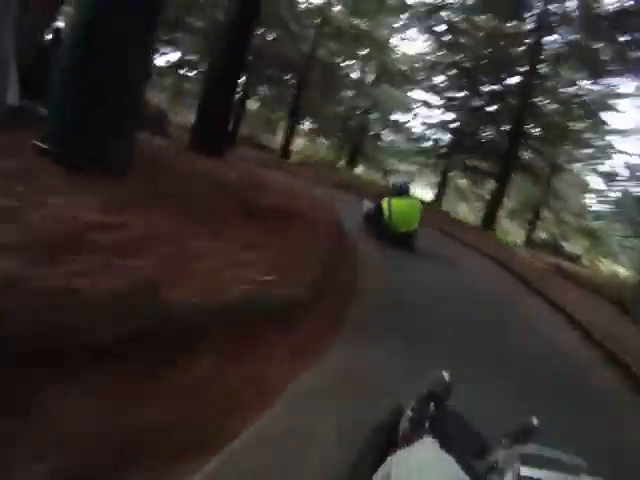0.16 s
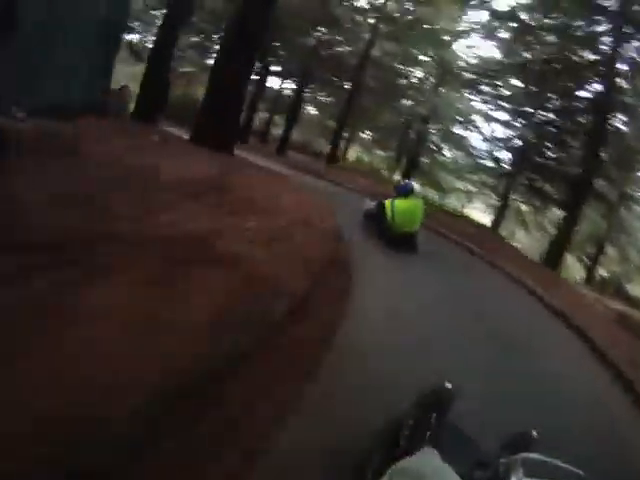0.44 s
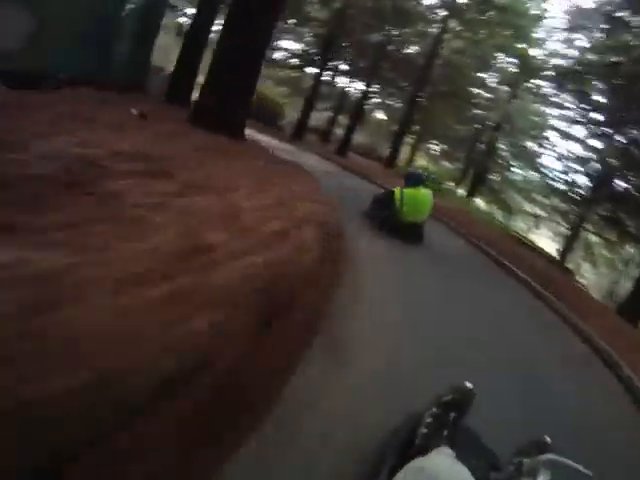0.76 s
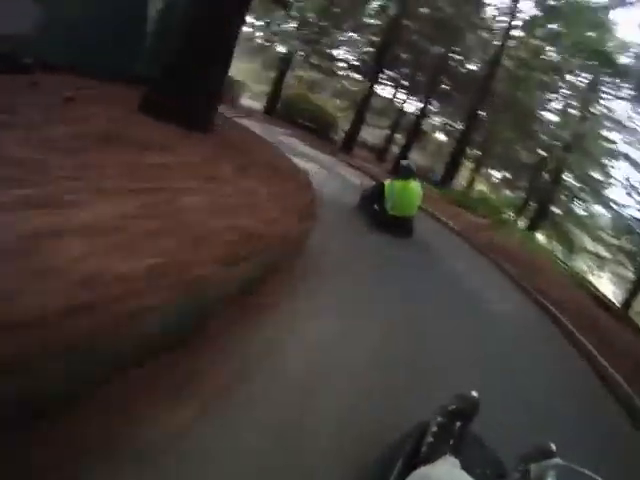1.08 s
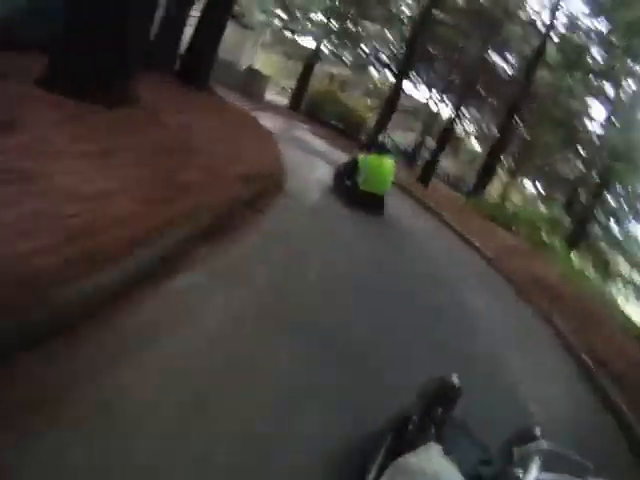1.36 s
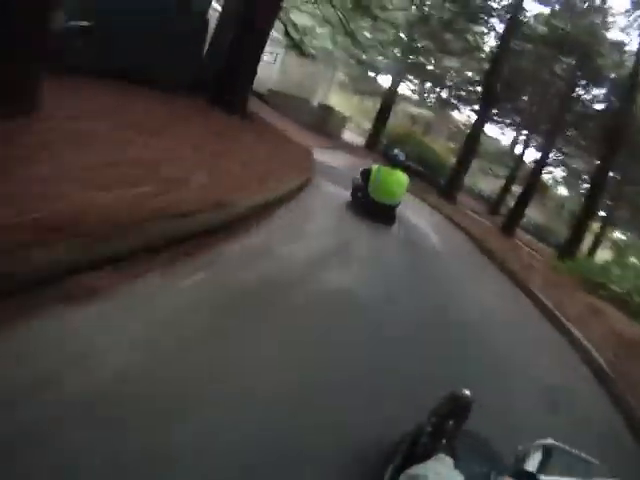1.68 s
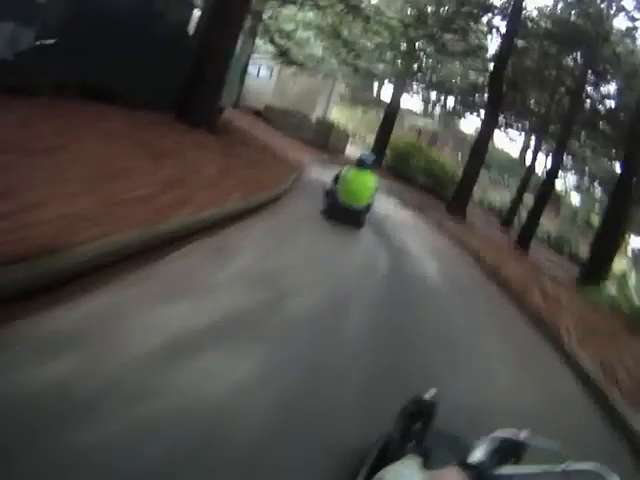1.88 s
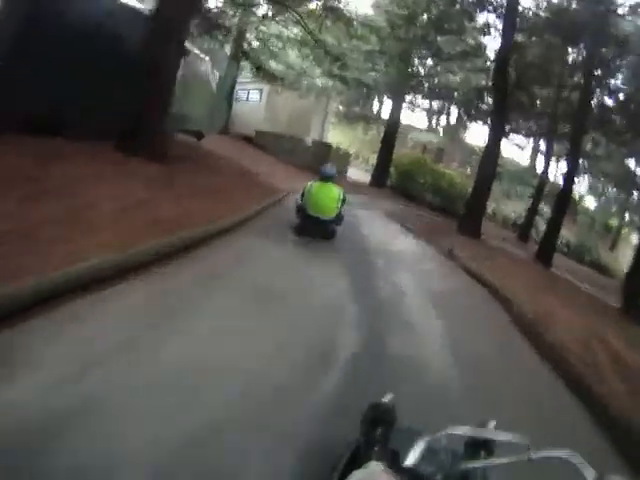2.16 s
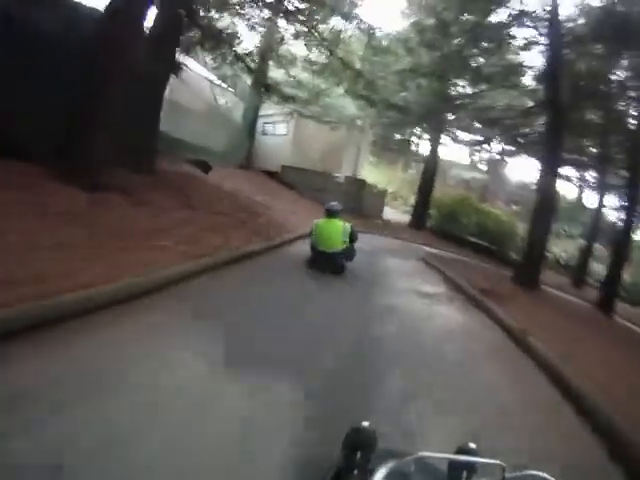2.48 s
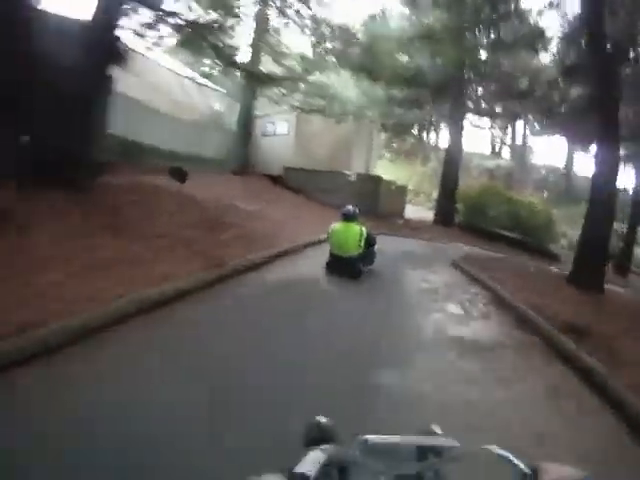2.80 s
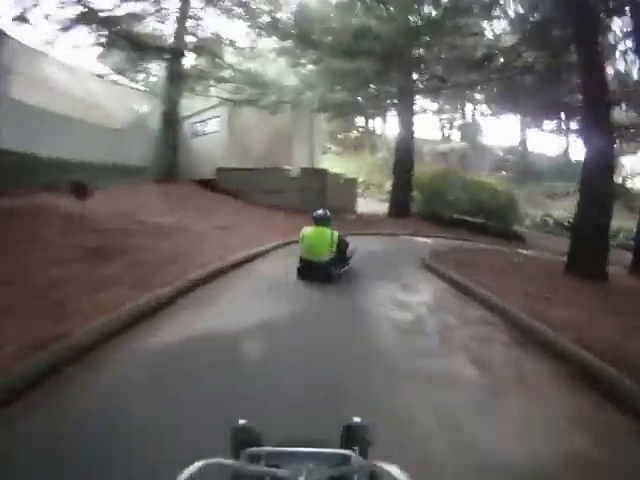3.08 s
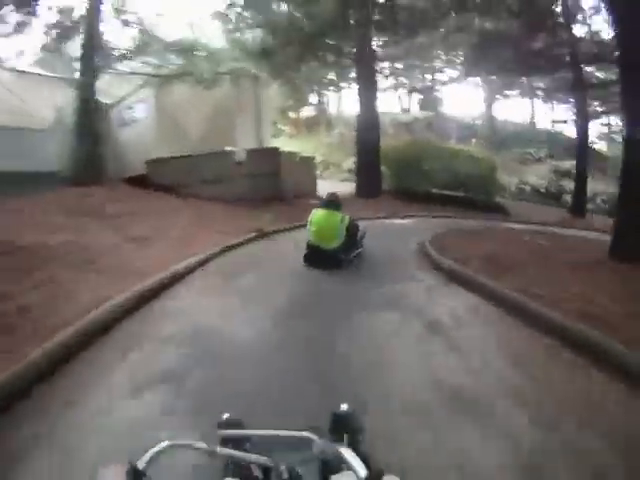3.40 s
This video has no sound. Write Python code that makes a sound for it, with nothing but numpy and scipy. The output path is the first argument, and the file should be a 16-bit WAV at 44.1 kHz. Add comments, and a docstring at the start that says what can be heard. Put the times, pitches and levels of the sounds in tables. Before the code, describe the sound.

A small cart rumbles over asphalt, rattling over bumps as wind buffets the microphone.

```python
"""Luge cart on a paved track

A coasting cart is heard from a camera in a housing on the rider. Hard wheels grind and drone on the
asphalt, driving the resonances of the plastic tub. Bumps knock the cart and ring its frame, grit
snaps and loose fittings chatter. Wind buffets the camera, jolts shove it, and for about half a
second the cart shudders at the turning rate of its wheels."""
import sys
import numpy as np
from scipy import signal
from scipy.fft import rfft, irfft
from scipy.io import wavfile

SR = 44100
rng = np.random.default_rng(int(sys.argv[2]) if len(sys.argv) > 2 else 0)


def output_pcm(signal):
    """Save a mono or channel-first signal as 16-bit PCM at the path in sys.argv[1].

    Samples are clipped to [-1, 1] before scaling.
    """
    pcm = np.clip(np.atleast_2d(signal).T, -1, 1) * 32767
    wavfile.write(sys.argv[1], SR, np.round(pcm).astype(np.int16))


N = 156114
T = np.arange(N) / SR

# grinding of the wheels on asphalt (time [s], relative level [dB])
ROLL_LEVEL = [(0, -50), (.17, -45.5), (.38, -44), (.54, -50), (.6, -47.5), (.72, -46.5), (.95, -50.5),
              (1.05, -47), (1.4, -48), (1.65, -49.5), (1.8, -45), (1.92, -42.5), (2.08, -46.5),
              (2.27, -45.5), (2.72, -46), (2.84, -44), (3.17, -46), (3.36, -44), (3.54, -45.5)]
# spectrum of the grinding (frequency [Hz], relative level [dB])
ROLL_SPECTRUM = [(40, 12.5), (120, -1.5), (270, 0.5), (480, 5.5), (700, -2.5), (1000, 0), (2300, -7),
                 (4000, -28.5), (7000, -30), (15000, -30)]
# chatter of grit and fittings (time [s], level [dB])
CHATTER_LEVEL = [(0, -55.5), (.46, -54.5), (.53, -60), (.6, -53.5), (.68, -57), (.94, -59.5), (1.0, -53),
                 (1.2, -56.5), (1.48, -55.5), (1.65, -60.5), (1.71, -54.5), (1.8, -54), (1.87, -51),
                 (2.12, -57.5), (2.22, -52), (2.37, -57.5), (2.46, -53), (2.7, -55), (2.82, -51),
                 (2.97, -54), (3.17, -53), (3.4, -49.5), (3.54, -54)]
# spectrum of the chatter (frequency [Hz], relative level [dB])
CHATTER_SPECTRUM = [(200, -22), (1500, -2), (3500, 11.5), (5000, 5.5), (8000, -2.5), (11000, 0),
                    (13800, -3.5), (15500, -14)]
# boom of the tub (time [s], relative level [dB])
BOOM_LEVEL = [(0, -34.5), (.16, -36.5), (.36, -35), (.53, -38), (.76, -34.5), (.9, -44), (1.07, -38),
              (1.3, -39), (1.6, -41.5), (1.85, -37.5), (2.05, -38), (2.35, -38), (2.55, -34.5),
              (2.72, -37.5), (2.83, -33), (2.96, -40.5), (3.12, -35), (3.54, -35.5)]
# modes of the plastic tub (frequency [Hz], bandwidth [Hz], relative level [dB])
TUB_MODES = [(61.5, 16, -7), (147.7, 20.7, -1), (175.3, 29.5, -0.5), (219.9, 13.4, -4.5),
             (311.2, 38.5, -10.5)]
# hollow drone of the wheels, higher in the bend (time [s], frequency [Hz], level [dB])
DRONE_CURVE = [(0, 505, -56), (.5, 502.4, -55.5), (1.901, 500, -60), (2.2, 400, -48.5), (2.5, 400, -53.5),
               (2.545, 389, -43.5), (2.59, 419.3, -50), (2.65, 405.3, -46), (2.739, 400, -57),
               (3.102, 387.5, -54)]
# wind on the camera (time [s], relative level [dB])
WIND_LEVEL = [(0, -30), (.12, -32.5), (.2, -39), (.39, -32), (.55, -39), (.66, -30), (.75, -50), (.86, -36),
              (1.15, -41), (1.45, -43.5), (1.56, -35), (1.8, -38), (1.92, -32.5), (2.15, -39.5),
              (2.45, -37), (3.54, -39)]
# spectrum of the wind (frequency [Hz], relative level [dB])
WIND_SPECTRUM = [(5, -11.5), (15, 1), (26, 0.5), (40, -1), (52, -12.5), (72, -11.5), (100, -22.5),
                 (200, -27.5), (600, -45.5), (4000, -101)]
# bumps in the track, in relative levels (time [s], knock [dB], rattle [dB], thump [dB], decay time [s])
TRACK_BUMPS = [(0.047, -46, -51, -63, 0.0053), (0.073, -51, -47, -60, 0.0053),
               (0.174, -39, -57, -35.5, 0.0077), (0.218, -36.5, -64, -46, 0.0034),
               (0.309, -46.5, -62, -43, 0.018), (.346, -45.5, -58, -35, .012),
               (.584, -45, -55, -31.5, 0.045), (.821, -47, -59, -37.5, 0.017), (0.982, -51, -55, -50, .008),
               (1.071, -45, -48.5, -39, 0.011), (1.692, -44.5, -54, -33.5, 0.04),
               (1.828, -38, -50.5, -32.5, 0.012), (1.910, -38.5, -65, -37, 0.01),
               (2.159, -45, -49, -37, 0.012), (2.194, -40.5, -49.5, -50, 0.015),
               (2.252, -43.5, -51.5, -34, 0.034), (2.428, -44.5, -56, -36, 0.043),
               (2.579, -42, -60, -38, 0.0063), (2.821, -43, -53, -29, .012),
               (2.874, -33.5, -40.5, -29.5, 0.0049), (2.879, -33.5, -39.5, -37, 0.0046),
               (2.887, -40, -46.5, -48, 0.015), (2.968, -42, -64, -46, 0.0035),
               (3.002, -44, -53.5, -31.5, 0.022), (3.077, -40, -68, -33, 0.015),
               (3.296, -46.5, -52, -31, 0.02), (3.331, -41, -49, -47, 0.012), (3.400, -55, -43, -42, 0.02),
               (3.427, -41.5, -49, -45, 0.01)]
# spectrum of an axle knock (frequency [Hz], relative level [dB])
KNOCK_SPECTRUM = [(60, -10), (300, -1), (650, 2), (1300, 1), (2500, 0), (4000, -14), (8000, -27),
                  (15000, -40)]
# spectrum of a rattle (frequency [Hz], relative level [dB])
RATTLE_SPECTRUM = [(200, -24), (1500, -8), (3500, 15.5), (5000, 6.5), (8000, 0.5), (11000, -1), (15500, -5)]
# modes of the metal frame (frequency [Hz], bandwidth [Hz], relative level [dB])
FRAME_MODES = [(580, 170, 2), (1170, 32, 1.5), (1319, 66, 0), (1846, 34, 7), (2244, 40, -12)]
# heavy jolts of the camera (time [s], level [dB], frequency [Hz])
CAMERA_JOLTS = [(0.064, -18, 35), (0.115, -21.5, 27.4), (0.366, -27, 48), (.397, -28, 42), (0.813, -28, 39),
                (1.88, -22.5, 53.24)]
# grit cracking under a wheel (time [s], level [dB])
GRIT_SNAPS = [(.22, -51), (.25, -47), (1.269, -46), (1.835, -43), (2.194, -44.5), (2.803, -46),
              (3.404, -56)]
# clinks of loose metal parts (time [s], frequency [Hz], level [dB])
METAL_CLINKS = [(.368, 1920, -38), (.819, 1880, -46), (1.268, 1450, -36), (1.83, 815, -33.5),
                (1.87, 2310, -39.5), (1.911, 1370, -36), (1.935, 2040, -38), (2.803, 1810, -35.5),
                (2.875, 610, -23.5), (2.878, 1213, -27), (2.88, 2460, -32), (3.292, 2240, -38)]
# peaks and dips of the camera housing (frequency [Hz], Gaussian width [Hz], relative gain [dB])
HOUSING_BANDS = [(794, 31, 3), (985, 75, -3.5), (1283, 118, 7), (1480, 149, -5), (3137, 135, -9),
                 (3580, 110, 0.5), (4170, 445, -6), (5140, 150, -2), (5978, 295, -16.5)]

WHEEL_HZ = 21.4  # mean turning rate


def amp(db):
    """Amplitude grows tenfold for every 20 dB."""
    return 10 ** (np.asarray(db) / 20)


def unit(x):
    """Normalisation to an rms of 1."""
    return x / np.sqrt(np.mean(x ** 2) + 1e-20)


def level(curve):
    """Amplitude envelope, interpolated from (time [s], level [dB])."""
    return amp(np.interp(T, *np.transpose(curve)))


def add(mix, start_s, sound):
    """Superposition of a sound on the mix from its start time."""
    part = mix[max(round(start_s * SR), 0):][:len(sound)]
    part += sound[:len(part)]


def minimum_phase(x, db_at, size=8192):
    """Minimum-phase filtering to the shape db_at(frequency), keeping the power of white noise."""
    db = np.maximum(db_at(abs(np.fft.fftfreq(size, 1 / SR))), -100)
    response = np.exp(np.conj(signal.hilbert(np.log(amp(db)))))
    taps = np.fft.ifft(response).real[:size // 2]
    return signal.fftconvolve(x, taps / np.linalg.norm(taps))[:len(x)]


def colour(x, spectrum):
    """Spectral shaping, interpolated along a logarithmic frequency axis."""
    hz, db = np.transpose(spectrum)
    return minimum_phase(x, lambda f: np.interp(np.log(f + 1), np.log(hz + 1), db))


def wander(cutoff_hz):
    """Random fluctuation: low-pass noise of rms 1."""
    rolloff = 1 + (np.fft.rfftfreq(N, 1 / SR) / cutoff_hz) ** 2
    return unit(irfft(rfft(rng.standard_normal(N)) / rolloff, N))


def grains(per_s, spread_db=2.5):
    """Shot noise: tiny independent impacts, a few of them large."""
    size = amp(spread_db * np.minimum(rng.exponential(1, N), 5))
    return unit(size * rng.choice([-1, 1], N) * (rng.random(N) < per_s / SR))


def ringing(modes):
    """A body's impulse response is a sum of damped modes; the wider ones die sooner."""
    t = T[:SR // 4]
    return sum((-1) ** k * amp(db) * np.sqrt(width) * np.exp(-np.pi * width * t)
               * np.sin(2 * np.pi * hz * t) for k, (hz, width, db) in enumerate(modes))


def rolling():
    """Forced vibration: rough asphalt drives grinding, chatter and tub boom, modulated once a turn."""
    turns = np.cumsum(WHEEL_HZ * (1 + 0.0633 * wander(1.62))) / SR
    throb = 0.052 * np.cos(2 * np.pi * turns)
    impacts = grains(per_s=4000) * (1 + throb) * amp(wander(26))
    grind = unit(colour(impacts, ROLL_SPECTRUM))
    grit = grains(per_s=1500) + 2.5 * rng.standard_normal(N)
    flutter = amp(1.5 * wander(35))
    chatter = unit(colour(grit * (1 + 0.24 * throb) * flutter, CHATTER_SPECTRUM))
    tub_force = rng.standard_normal(N) * (1 + throb)
    boom = unit(signal.fftconvolve(tub_force, ringing(TUB_MODES))[:N])
    return (amp(-1) * level(ROLL_LEVEL) * grind + level(CHATTER_LEVEL) * chatter
            + amp(-1.5) * level(BOOM_LEVEL) * boom)


def wheel_drone(width_hz=23.5):
    """Narrow-band noise: a rough, wavering hum of the wheels that sinks as the cart leaves the bend."""
    times, hz, db = np.transpose(DRONE_CURVE)
    pitch_hz = np.interp(T, times, hz) * (1 + .07 * wander(16))
    phase = 2 * np.pi * np.cumsum(pitch_hz) / SR
    hum = unit(wander(width_hz) * np.cos(phase) + wander(width_hz) * np.sin(phase))
    return amp(np.interp(T, times, db)) * hum


def wind():
    """Turbulent pressure fluctuations buffet the camera with low, lumpy noise."""
    return amp(2) * level(WIND_LEVEL) * unit(colour(rng.standard_normal(N), WIND_SPECTRUM))


def metal_ring(hz, decay_s):
    """Damped free vibration of a small metal part, with one inharmonic overtone."""
    t = T[:SR // 10]
    phase = 2 * np.pi * hz * t
    return (np.sin(phase) + amp(-12.5) * np.sin(1.48 * phase)) * np.exp(-t / decay_s)


def fitting_ticks(low_hz=1241, high_hz=13030, db_per_octave=-3.5, decay_cycles=7.7):
    """Random impacts ring loose fittings in faint flurries that follow the level of the rolling."""
    out = np.zeros(N)
    flurry = amp(3 * wander(4.3))
    for hz in np.geomspace(low_hz, high_hz, 16):
        ticks = signal.fftconvolve(grains(per_s=36) * flurry, metal_ring(hz, decay_cycles / hz))[:N]
        out += amp(db_per_octave * np.log2(hz / low_hz)) * unit(ticks)
    return amp(-12) * level(ROLL_LEVEL) * unit(out)


def bumps(rise_s=.001):
    """Impact excitation: each bump knocks the axles, rings the frame, rattles and thumps the tub."""
    knocks, rattles, thumps = np.zeros((3, N))
    t, tub, frame = T[:SR // 4], ringing(TUB_MODES), ringing(FRAME_MODES)
    for start_s, knock_db, rattle_db, thump_db, decay_s in TRACK_BUMPS:
        envelope = np.minimum(t / rise_s, 1) * np.exp(-t / decay_s)
        knock, rattle = rng.standard_normal((2, len(t))) * envelope
        add(knocks, start_s, amp(knock_db) * knock)
        add(rattles, start_s, amp(rattle_db) * rattle)
        add(thumps, start_s, amp(thump_db) * tub / abs(tub).max())
    rings = signal.fftconvolve(knocks, frame / np.linalg.norm(frame))[:N]
    return (colour(knocks, KNOCK_SPECTRUM) + amp(-5.5) * rings
            + amp(4) * colour(rattles, RATTLE_SPECTRUM) + amp(5.5) * thumps)


def jolts(width_cycles=.4):
    """Each shove of the camera is a low-frequency pulse: a cosine under a Gaussian envelope."""
    out = np.zeros(N)
    for centre_s, db, hz in CAMERA_JOLTS:
        cycles = (T - centre_s) * hz
        out -= amp(db) * np.cos(2 * np.pi * cycles) * np.exp(-.5 * (cycles / width_cycles) ** 2)
    return out


def snaps(decay_s=0.0022):
    """Brittle fracture: grit cracks under the wheels in short broadband bursts."""
    out, t = np.zeros(N), T[:SR // 20]
    for start_s, db in GRIT_SNAPS:
        add(out, start_s, amp(db) * rng.standard_normal(len(t)) * np.exp(-t / decay_s))
    return out


def clinks():
    """Loose metal parts, struck singly, ring briefly at their natural frequencies."""
    out = np.zeros(N)
    for start_s, hz, db in METAL_CLINKS:
        add(out, start_s, amp(db) * metal_ring(hz, decay_s=0.004))
    return out


def shudder(start_s=2.236, rise_s=.03, fall_after_s=.26, fall_s=.33, sharpness=0.41):
    """Periodic forcing: four harmonics of the turning rate form one thud per wheel turn."""
    t = T - start_s
    swell = np.clip(np.minimum(t / rise_s, 1 - (t - fall_after_s) / fall_s), 0, 1)
    angle = 2 * np.pi * WHEEL_HZ * t
    thuds = sum((-sharpness) ** (k - 1) / np.sqrt(k) * np.cos(k * angle) for k in range(1, 5))
    return amp(-24.5) * swell * thuds


def scene():
    """Superposition: all sources add at the camera, in one channel."""
    return (rolling() + wheel_drone() + wind() + fitting_ticks() + bumps()
            + jolts() + snaps() + clinks() + shudder())[None]


def record(dry, cutoff_hz=15500):
    """Linear filtering: the housing's peaks and dips colour the sound, and a low-pass limits its band."""
    def housing_db(f):
        return sum(db * np.exp(-.5 * ((f - hz) / width) ** 2) for hz, width, db in HOUSING_BANDS)
    heard = minimum_phase(dry[0], housing_db)
    low_pass = signal.firwin(511, cutoff_hz, window=("kaiser", 9), fs=SR)
    return signal.oaconvolve(heard, low_pass, "same")[None]


dry = scene()
out = record(dry)
output_pcm(out)
```